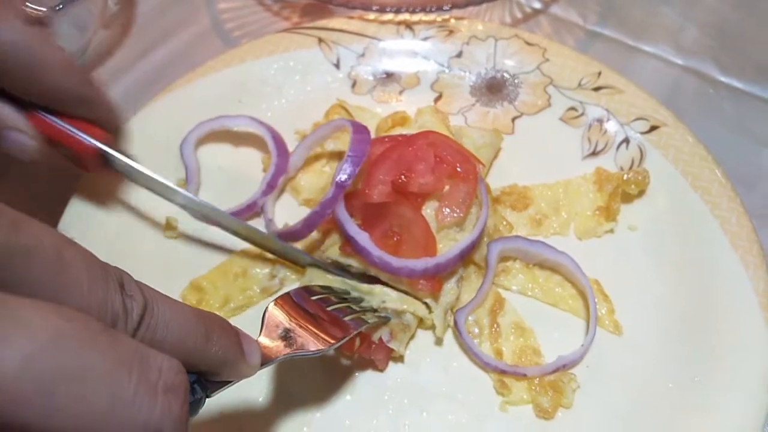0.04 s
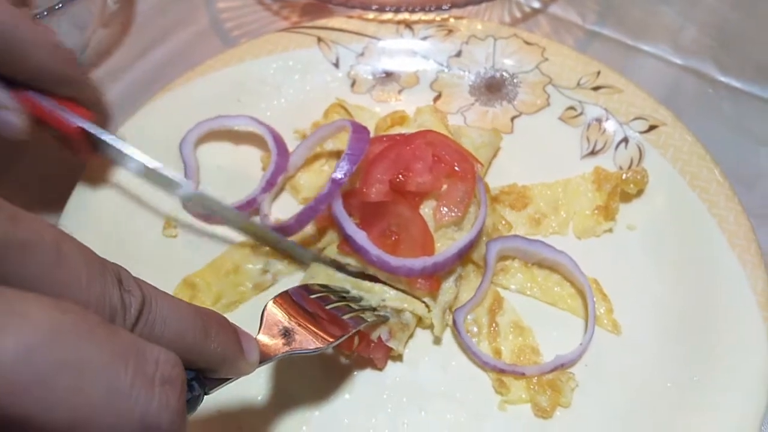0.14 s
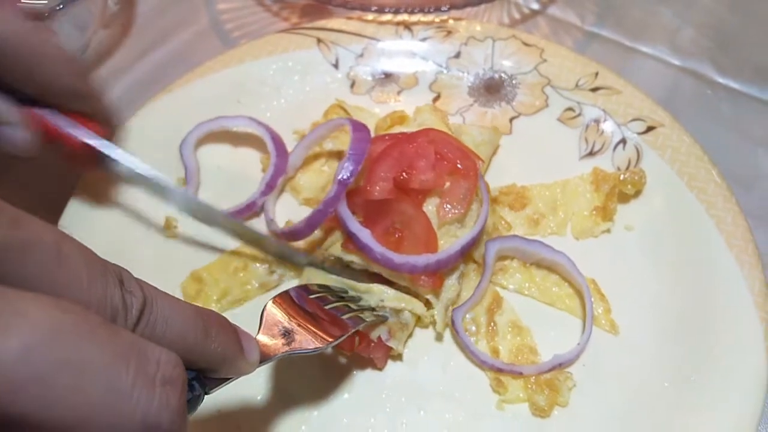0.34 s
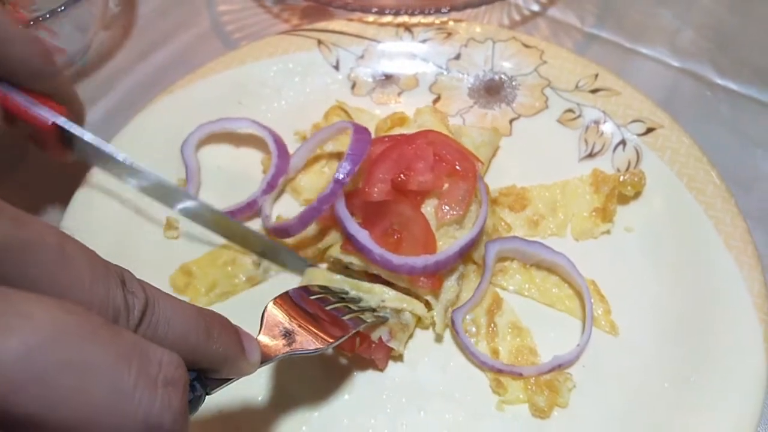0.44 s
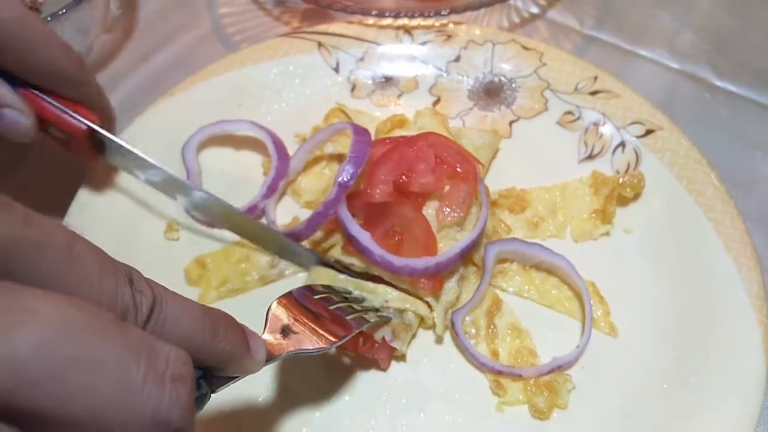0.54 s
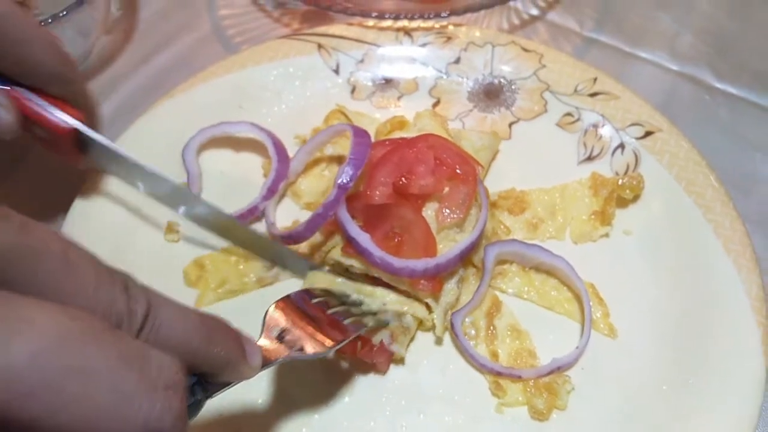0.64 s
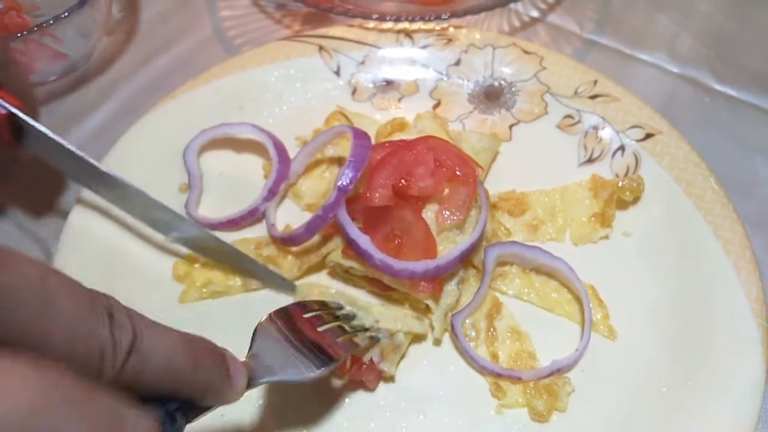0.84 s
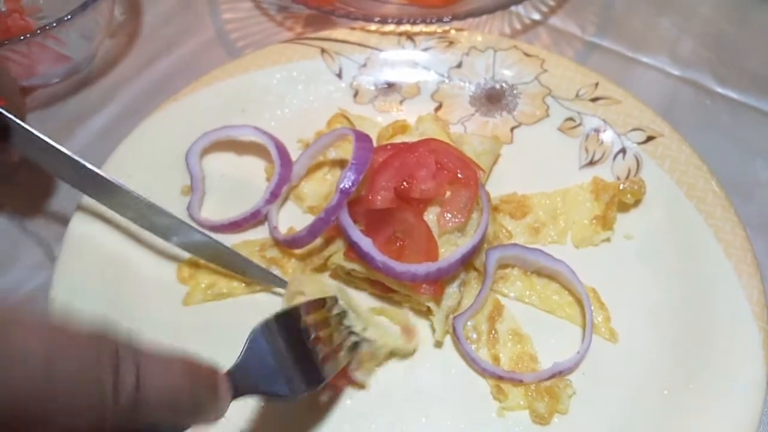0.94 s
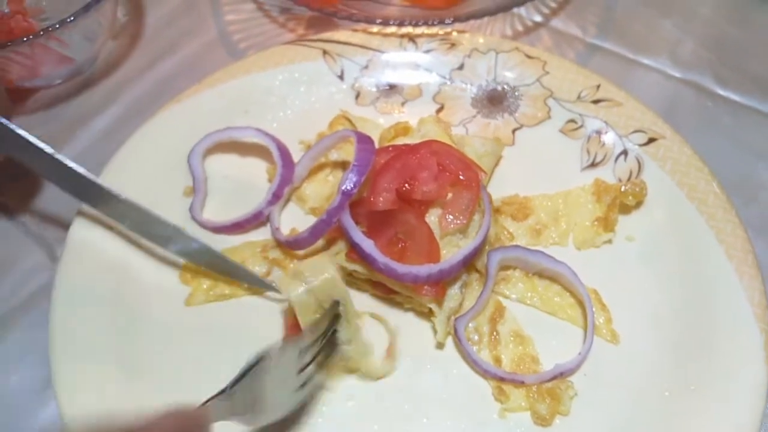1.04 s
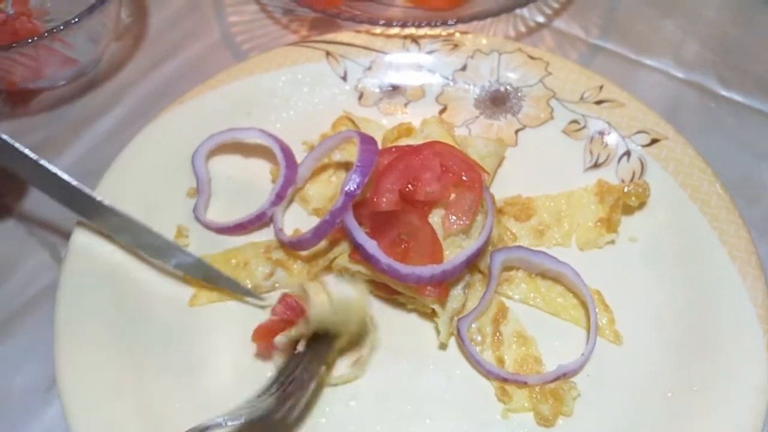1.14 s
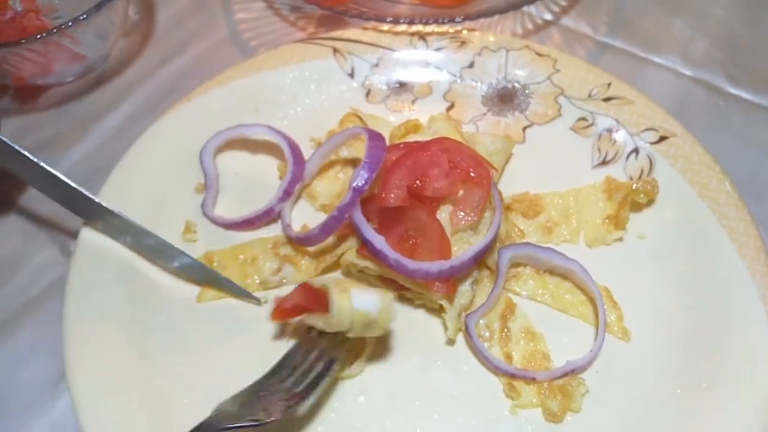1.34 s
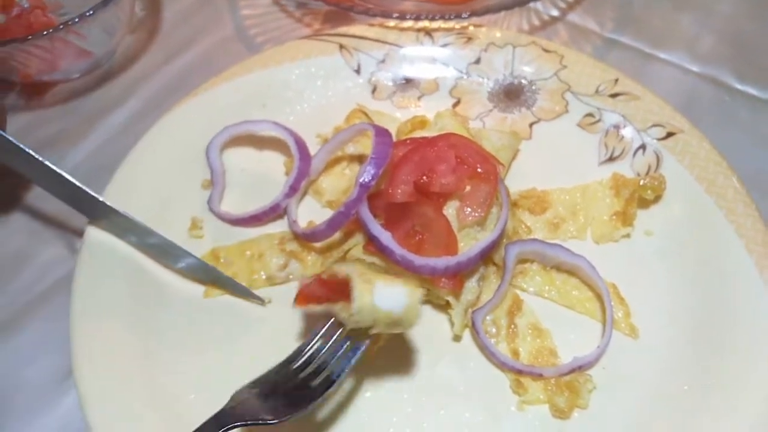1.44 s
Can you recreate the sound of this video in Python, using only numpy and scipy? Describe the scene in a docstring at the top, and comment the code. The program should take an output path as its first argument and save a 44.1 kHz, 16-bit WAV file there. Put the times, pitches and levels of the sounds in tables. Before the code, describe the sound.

Cutlery on china: a knife saws with brief gritty squeals, then a fork drags and clinks

```python
"""A table knife saws through an omelette on a china plate; hum, hiss and a small kitchen surround it.
From the start the blade rubs (streams of tiny slips) and clicks on the glaze; from 0.2 s wet food squelches.
At 0.44 s and 0.70 s it bites into a short screech: dense stick-slip through the modes of the steel.
From 0.91 s a fork drags, squeaks and clicks; each knife or fork click knocks the plate and its china rings.
From 1.12 s a faint hollow drone of resonant noise comes up, then the fork clicks faintly as the hiss fades."""
import sys
import numpy as np
from scipy import signal
from scipy.fft import rfft, irfft, next_fast_len
from scipy.io import wavfile
from scipy.ndimage import map_coordinates

SR = 44100
rng = np.random.default_rng(int(sys.argv[2]) if len(sys.argv) > 2 else 0)


def put_to_file(sound):
    """Save the sound as 16-bit audio at rate SR, in the file named by the first command-line argument."""
    columns = np.atleast_2d(sound).T  # one column per channel
    safe = np.clip(columns, -1, 1)
    whole_steps = np.round(safe * 32767)
    wavfile.write(sys.argv[1], SR, whole_steps.astype(np.int16))


N = 66150
T = np.arange(N) / SR
SIZE = next_fast_len(N + SR // 5)
HZ = np.fft.rfftfreq(SIZE, 1 / SR)


def amp(db):
    """Decibels to amplitude ratio."""
    return np.exp(np.asarray(db) * (np.log(10) / 20))


def unit(x):
    """Scale to rms 1."""
    return x / np.sqrt(np.mean(np.abs(x) ** 2) + 1e-20)


def along(points, hz):
    """Interpolate (f/Hz, value) points on a log frequency axis."""
    f, v = np.transpose(points)
    return np.interp(np.log(hz + 1), np.log(f + 1), v)


def filtered(x, response):
    """Apply a frequency response given on the HZ grid."""
    return irfft(rfft(x, SIZE) * response, SIZE)[..., :N]


def colour(points):
    """Minimum-phase response of unit power through (f/Hz, level/dB) points."""
    cepstrum = irfft(np.log(amp(along(points, HZ))), SIZE)
    cepstrum[1:SIZE // 2] *= 2
    cepstrum[SIZE // 2 + 1:] = 0
    return unit(np.exp(rfft(cepstrum)))


def resonances(rows):
    """Sum of damped second-order modes with alternating sign."""
    total = 0
    for k, (f_hz, width_hz, db) in enumerate(rows):
        damping = 1j * HZ * width_hz
        total = total + (-1) ** k * amp(db) * damping / (f_hz ** 2 - HZ ** 2 + damping)
    return total


def wobble(rate_hz):
    """Smooth random curve through rate_hz knots a second."""
    return map_coordinates(rng.standard_normal(1024), [T * rate_hz], mode="mirror")


def strokes(rows, attack_s, release_s):
    """Summed envelopes: linear attack, hold, then a fall of 60 dB per release_s."""
    total = 0
    for start_s, length_s, db in rows:
        fall_db = 60 * np.maximum(T - start_s - length_s, 0) / release_s
        total = total + amp(db - fall_db) * np.clip((T - start_s) / attack_s, 0, 1)
    return total


def slips(rate_hz, scatter_db):
    """Random tiny slips of either sign and uneven size, rms 1."""
    occurs = rng.random(N) < rate_hz / SR
    return unit(occurs * rng.choice([-1, 1], N) * amp(scatter_db * rng.standard_normal(N)))


def contacts(rows, chatter_s, chatter_db):
    """Each contact is one sharp push and a brief noisy chatter falling 60 dB in chatter_s."""
    out, t = np.zeros(N + SR), np.arange(SR // 20) / SR
    for s, db in rows:
        blow = amp(chatter_db - 60 * t / chatter_s) * rng.standard_normal(len(t))
        blow[0] = 1
        out[round(s * SR):][:len(t)] += amp(db) * blow / np.linalg.norm(blow)
    return out[:N]


# broadband grit of the contact: f/Hz, relative level/dB
GRIT_COLOUR = [(150, -42.5), (320, -39.5), (450, -15.5), (1000, -9.5), (1300, -4), (2200, -3.5),
               (4500, 0.5), (7000, -4.5), (9000, -1.5), (11000, -6), (12200, -20), (14200, -22)]


def steel(rows, grit_db):
    """A utensil's resonances plus the broadband contact grit, 16 samples later."""
    delay = np.exp(-2j * np.pi * HZ * 16 / SR)
    return unit(unit(resonances(rows)) + amp(grit_db) * colour(GRIT_COLOUR) * delay)


JUDDER_HZ = 111


def screech(start_s, bite, modes, grit_db):
    """Dense stick-slip builds up, judders and lets go through the modes of the blade."""
    rise_s, hold_s, release_s, entry_db, top_db, judder_db = bite
    t = T - start_s
    level_db = np.interp(t, [0, rise_s], [entry_db, top_db])
    level_db = level_db - 60 * np.maximum(t - rise_s - hold_s, 0) / release_s
    judder = np.cos(2 * np.pi * JUDDER_HZ * t + 0.2 * wobble(40))
    onset = np.clip(t / 0.00035, 0, 1)
    force = amp(level_db + judder_db * judder) * onset * slips(rate_hz=9000, scatter_db=1.5)
    return filtered(force, steel(modes, grit_db))


# soft rubbing of the blade: t/s, length/s, level/dB
RUBS = [(-.01, 0.036, -54.5), (.045, 0.071, -57), (.12, 0.039, -63.5), (.196, 0.088, -51),
        (.345, 0.04, -49.5), (.39, 0.044, -59), (.49, 0.08, -56.5), (.553, 0.039, -53.5),
        (.644, 0.008, -46), (.76, 0.035, -47.5)]
# blade clicks on the plate: t/s, level/dB (before +9 dB), plate knock/dB (before +13 dB)
KNIFE_CLICKS = [(.0222, -38, -46), (.0255, -35.5, -63), (.080, -36.5, -72), (.104, -45.5, -79),
                (.1415, -51.5, -76), (.2073, -23, -31.5), (.358, -35.5, -42), (.3712, -24.5, -36.5),
                (.4602, -24.5, -36), (.558, -43, -45.5), (.6485, -31, -49.5)]
# blade biting the glaze: rise/s, hold/s, release/s, entry/dB, top/dB, judder/+-dB
PUSH_BITE = (.025, .004, .065, -37.5, -28.7, 1.1)
PULL_BITE = (0.0557, 0.0063, 0.0235, -34.5, -33, 4)
# blade modes, which move with the point of contact: f/Hz, width/Hz, relative level/dB
PUSH_MODES = [(2160, 200, -13), (2750, 340, -10.5), (4160, 350, -9), (4553, 140, -2), (4687, 130, 1.5),
              (5290, 260, -7), (6120, 930, -14)]
PULL_MODES = [(2250, 390, -9), (2580, 110, -6.5), (3146, 150, -14.5), (4440, 150, -14.5), (5450, 220, 2),
              (5875, 490, -5), (7050, 330, -1.5), (9570, 170, -13.5)]
RUB_MODES = [(2230, 330, -3.5), (2836, 310, -2), (3150, 120, -7.5), (4472, 236, 0.5), (5450, 490, -3),
             (6620, 320, -7.5)]
# softer tone of the rubbing: f/Hz, relative level/dB
RUB_COLOUR = [(300, -12.5), (1000, -11), (1800, -3.5), (2200, 1.5), (9000, -0.5), (13000, -4)]
PUSH_S, PULL_S = .4365, .701


def knife():
    """The blade rubs and clicks, and screeches once in each direction."""
    rub = strokes(RUBS, attack_s=0.0043, release_s=0.09)
    rub = rub * slips(rate_hz=3800, scatter_db=3.5) * amp(1.1 * wobble(131))
    rub = filtered(rub, unit(steel(RUB_MODES, grit_db=-2) * colour(RUB_COLOUR)))
    clicks = contacts([(s, db) for s, db, _ in KNIFE_CLICKS], chatter_s=0.0047, chatter_db=-12)
    clicks = filtered(amp(9) * clicks, steel(RUB_MODES, grit_db=-8.5))
    push = screech(PUSH_S, PUSH_BITE, PUSH_MODES, grit_db=-11.5)
    pull = screech(PULL_S, PULL_BITE, PULL_MODES, grit_db=-8)
    return rub + clicks + push + pull


# fork slides: t/s, length/s, drag level/dB, squeak level/dB
DRAGS = [(0.909, 0.054, -60, -48.5), (0.963, 0.054, -54, -66), (1.029, 0.036, -58.5, -88),
         (1.076, 0.023, -57, -63), (1.11, 0.096, -73.5, -84.5)]
# fork clicks on the plate: t/s, level/dB (before +9.5 dB), plate knock/dB (before +13 dB)
FORK_CLICKS = [(.920, -38, -56), (0.925, -39.5, -71), (0.952, -31, -45), (1.003, -37, -52),
               (1.039, -34, -41.5), (1.0727, -38.5, -62), (1.0852, -36, -66)]
# modes of the fork and of its squeak: f/Hz, width/Hz, relative level/dB
FORK_MODES = [(1520, 260, -7), (2050, 450, -7), (2600, 200, -6), (3320, 190, -1), (4080, 190, -1),
              (5200, 260, -2), (5950, 260, -2), (7050, 220, -9)]
SQUEAK_MODES = [(5020, 330, -2), (5260, 260, 0)]


def fork():
    """The tines drag, squeak and click across the glaze; slips and blows excite their modes."""
    drag = strokes([(s, n, db) for s, n, db, _ in DRAGS], attack_s=0.0079, release_s=0.075)
    drag = drag * slips(rate_hz=2900, scatter_db=6) * amp(1.3 * wobble(130))
    squeak = strokes([(s, n, db) for s, n, _, db in DRAGS], attack_s=0.0094, release_s=.04)
    squeak = squeak * slips(rate_hz=3700, scatter_db=4)
    clicks = contacts([(s, db) for s, db, _ in FORK_CLICKS], chatter_s=0.0046, chatter_db=-9)
    body = filtered(drag + amp(9.5) * clicks, steel(FORK_MODES, grit_db=-11))
    return body + filtered(squeak, unit(resonances(SQUEAK_MODES)))


# faint late fork clicks: t/s, level/dB (before +6.5 dB)
LATE_FORK_TICKS = [(1.291, -50.5), (1.334, -49.5), (1.387, -52.5)]
# colour of these clicks and of the hiss: f/Hz, relative level/dB
HISS_COLOUR = [(1000, -34), (3500, -22.5), (4500, -0.5), (5500, 0.5), (7500, -8), (10000, -4.5),
               (12000, -25), (14000, -47)]


def late_fork():
    """Faint late fork clicks: sharp blows with a longer chatter, coloured bright."""
    clicks = amp(6.5) * contacts(LATE_FORK_TICKS, chatter_s=0.0111, chatter_db=-4)
    return filtered(clicks, colour(HISS_COLOUR))


# plate knocked on the table: f/Hz, width/Hz, relative level/dB
KNOCK_MODES = [(450, 13, -19), (786.6, 26, 0.5), (950, 54, -5), (1123, 28, 4), (1474, 48, -3.5),
               (2260, 71, 1.5), (2740, 240, -4.5)]


def knocks():
    """Each click in the two click tables also knocks the plate on the table: an impulse into low modes."""
    blows = np.zeros(N)
    for s, _, db in KNIFE_CLICKS + FORK_CLICKS:
        blows[round(s * SR)] += amp(db + 13)
    tone = colour([(200, -23), (330, -19.5), (450, 1.5), (3000, 1.5), (9000, -3.5)])
    return filtered(blows, unit(resonances(KNOCK_MODES) * tone))


# long ringing of the china: f/Hz, width/Hz, level/dB
PLATE_MODES = [(1740, 12, -6), (2184, 22, -3), (2186, 10, -0.5), (2623, 14, 3), (2825, 16, -5.5),
               (3400, 13, -13.5), (4530, 9, -10.5), (5330, 14, -7)]
PLATE_DB = 0


def plate_ring(cutlery):
    """The cutlery drives narrow, slowly decaying modes of the china."""
    return amp(PLATE_DB) * filtered(cutlery, resonances(PLATE_MODES) * 1j)


# wet food squeezed: t/s, length/s, level/dB
SQUEEZES = [(.215, 0.098, -67), (.43, 0.075, -60), (.553, 0.045, -58), (.62, 0.081, -70.5),
            (.70, 0.083, -58.5), (.778, 0.031, -53), (.82, 0.11, -65), (.92, 0.079, -59),
            (.945, 0.0048, -54), (1.02, 0.081, -65), (1.036, 0.0031, -55.5)]
# tiny bright ticks: t/s, level/dB (before +9 dB)
TICKS = [(.197, -47), (.338, -30.5), (.4325, -35), (.884, -51.5)]
# colours of squelch and ticks: f/Hz, relative level/dB
FOOD_COLOUR = [(200, -49), (330, -33.5), (430, -8), (580, -1), (850, -5.5), (1250, -15.5), (1600, -7),
               (3000, -12.5), (8000, -53)]
TICK_COLOUR = [(500, -38), (3500, -4), (5500, -8.5), (8500, 8.5), (11500, -9), (14000, -26)]


def food():
    """The moist omelette squelches in tiny slips and ticks in short blows."""
    squelch = strokes(SQUEEZES, attack_s=0.0036, release_s=0.064) * slips(rate_hz=1500, scatter_db=3)
    ticks = amp(9) * contacts(TICKS, chatter_s=.003, chatter_db=-9.5)
    return filtered(squelch, colour(FOOD_COLOUR)) + filtered(ticks, colour(TICK_COLOUR))


EARLY_DB, EARLY_T60_S = -6.5, 0.037


def nearby(x):
    """Plate, hands and table scatter the sound for a few milliseconds, differently at each port."""
    t = np.arange(SR // 20) / SR
    echoes = rng.standard_normal((2, len(t))) * amp(-60 * t / EARLY_T60_S) * np.clip(t / 0.0015, 0, 1)
    echoes = echoes / np.linalg.norm(echoes, axis=1, keepdims=True)
    return amp(EARLY_DB) * signal.fftconvolve(x[None], echoes, axes=1)[:, :N]


# decay of the kitchen: f/Hz, t60/s
KITCHEN_T60 = [(200, 0.84), (2000, 0.38), (6000, 0.36), (13000, 0.34)]
# what the kitchen throws back: f/Hz, relative level/dB
WALLS = [(300, -3), (900, 4.5), (2500, 4), (3800, 0), (4700, -10), (5600, -7), (7100, -4), (9000, 1.5),
         (14000, -3)]
ROOM_DB = -10.5


def kitchen(x):
    """The room returns a short diffuse tail, noise decaying per band, different at each port."""
    hz, t, z = signal.stft(rng.standard_normal((2, SR // 2)), SR, nperseg=256)
    decay = amp(-60 * t / along(KITCHEN_T60, hz)[:, None])
    tail = signal.istft(z * decay, SR, nperseg=256)[1]
    tail = np.pad(tail / np.linalg.norm(tail[0]), ((0, 0), (SR // 300, 0)))  # delay of 1/300 s
    reflected = filtered(x, amp(along(WALLS, HZ)))
    return amp(ROOM_DB) * signal.fftconvolve(reflected[None], tail, axes=1)[:, :N]


# hollow drone: f/Hz, width/Hz, relative level/dB
DRONE_MODES = [(446, 27, 0.5), (673, 80, -10), (793, 40, -6), (1206, 33, -10)]


def drone():
    """A hollow drone comes up late: noise through damped modes."""
    tone = colour([(200, -22), (400, 3.5), (850, 2.5), (1300, -25), (3000, -21)])
    noise = filtered(rng.standard_normal(N), unit(resonances(DRONE_MODES) * tone))
    return strokes([(1.12, .4, -65.5)], attack_s=0.059, release_s=.2) * noise


# low handling rumble: t/s, length/s, level/dB
HANDLINGS = [(.12, .14, -60.5), (.26, .17, -69.5), (.62, 0.1, -73.5), (1.25, 0.17, -74.5), (1.44, .08, -61)]
# its colour: f/Hz, relative level/dB
HANDLING_COLOUR = [(60, -27.5), (140, -5), (190, 2), (240, -11.5), (320, -37), (480, -15), (800, -37.5),
                   (3000, -79)]


def handling():
    """Low handling noise swells in short strokes of coloured noise."""
    noise = filtered(rng.standard_normal(N), colour(HANDLING_COLOUR))
    return strokes(HANDLINGS, attack_s=0.016, release_s=0.13) * noise


HUM_HZ, HUM_DB = 100.5, -54  # level as rms


def hum():
    """Mains hum: one sine whose level wavers slightly."""
    sine = np.sin(2 * np.pi * (HUM_HZ * T + rng.random()))
    return amp(HUM_DB + 0.34 * wobble(13)) * np.sqrt(2) * sine


# room rumble: f/Hz, relative level/dB
FLOOR_COLOUR = [(20, -11), (50, -7.5), (85, 8), (145, 8.5), (200, -14.5), (300, -19.5), (500, -13),
                (1000, -26), (3000, -35), (14000, -47)]


def background():
    """Hum, handling and drone over steady room rumble and a hiss of tiny impulses that fades."""
    noise = rng.standard_normal(N) + .5 * rng.standard_normal((2, N))  # part shared by both ports
    floor = amp(-69) * filtered(noise, colour(FLOOR_COLOUR))
    hiss_db = np.interp(T, [1.15, 1.35, 1.5], [-67, -75, -86])
    hiss = amp(hiss_db) * filtered(slips(rate_hz=5900, scatter_db=3), colour(HISS_COLOUR))
    return hum() + handling() + drone() + floor + hiss


def scene():
    """Cutlery, ringing plate and food in the kitchen."""
    cutlery = knife() + fork() + knocks()
    near = cutlery + plate_ring(cutlery) + late_fork() + food()
    return near + nearby(near) + kitchen(near) + background()


# left minus right at the two microphone ports: f/Hz, level/dB
PORT_LEVEL = [(100, 1), (700, 1.5), (1100, 2.5), (1700, -3), (2400, 4), (3200, 7), (4600, 19.5), (6000, 17),
              (7100, 10.5), (8000, -3.5), (9200, -10.5), (10200, -22.5), (14000, -8.5)]
# left minus right: f/Hz, phase/rad
PORT_PHASE = [(100, 0.14), (700, 0.63), (1500, 1.14), (3000, 1.48), (14000, 1.76)]
TOP_HZ = 14330


def record(dry):
    """The two ports differ in level and phase; nothing passes above the band limit."""
    side = np.array([[.5], [-.5]])
    gains = amp(side * along(PORT_LEVEL, HZ))
    gains = gains / np.sqrt(np.mean(gains ** 2, axis=0))
    phase = np.exp(1j * side * along(PORT_PHASE, HZ))
    return filtered(dry, gains * phase * (HZ < TOP_HZ))


dry = scene()
out = record(dry)
put_to_file(out)
```